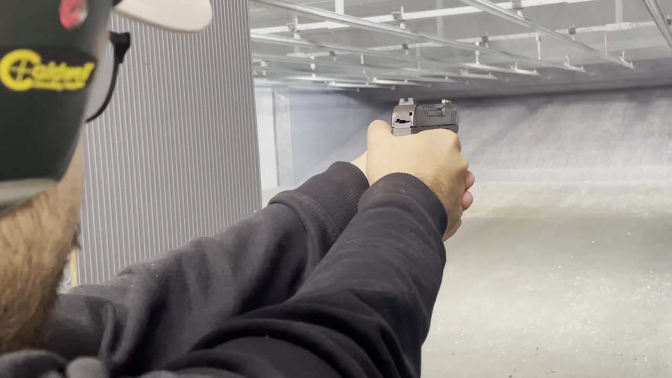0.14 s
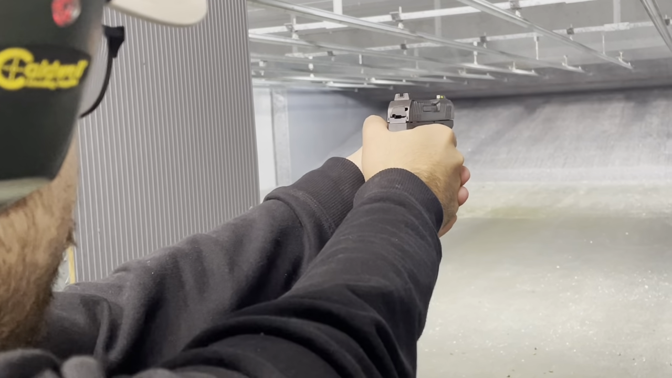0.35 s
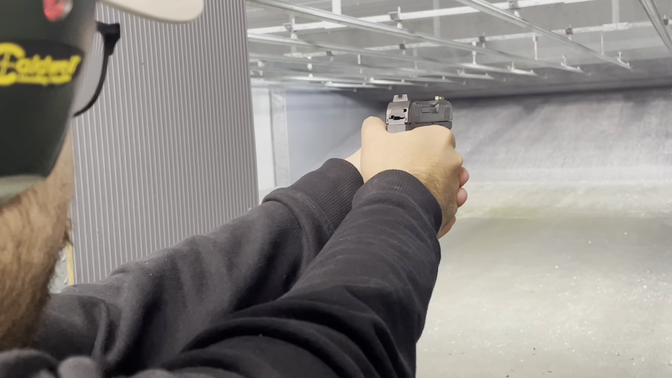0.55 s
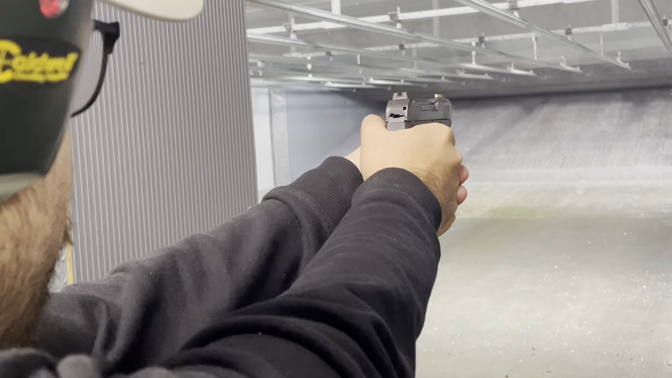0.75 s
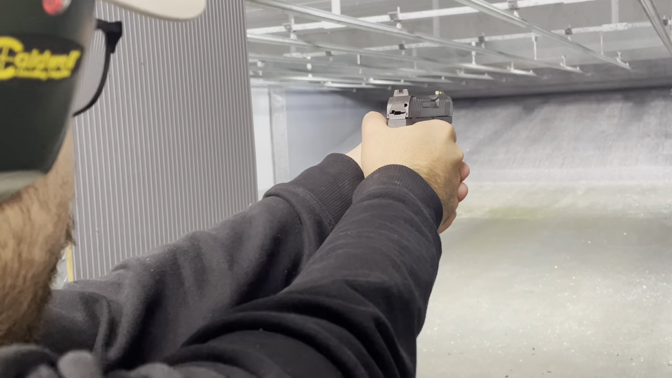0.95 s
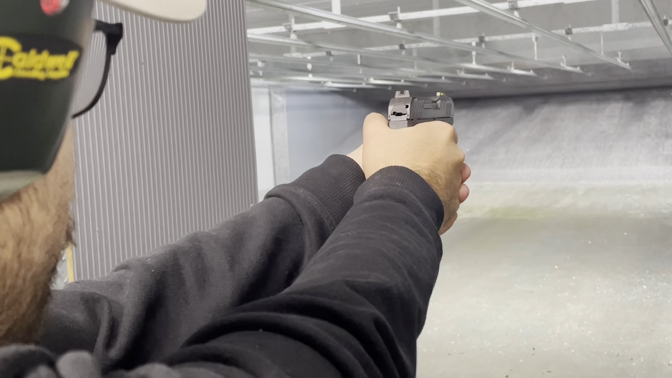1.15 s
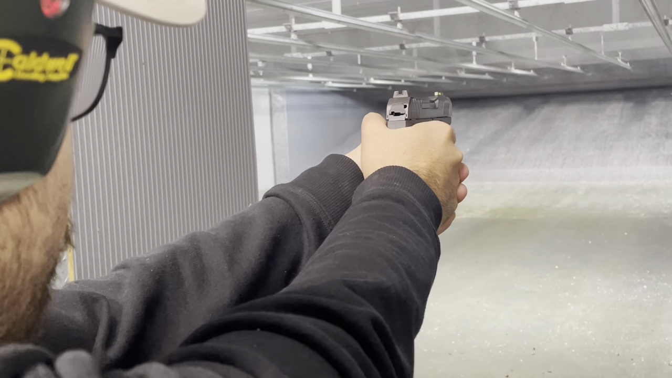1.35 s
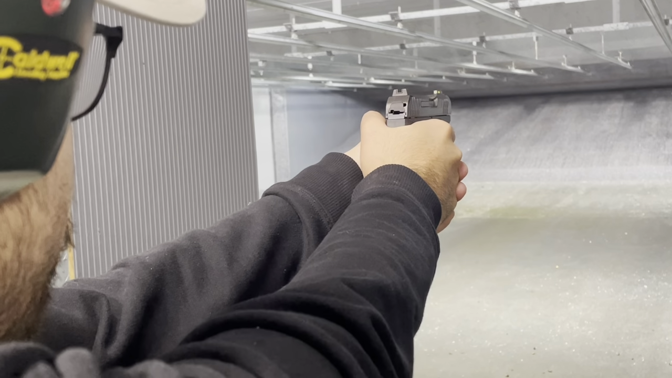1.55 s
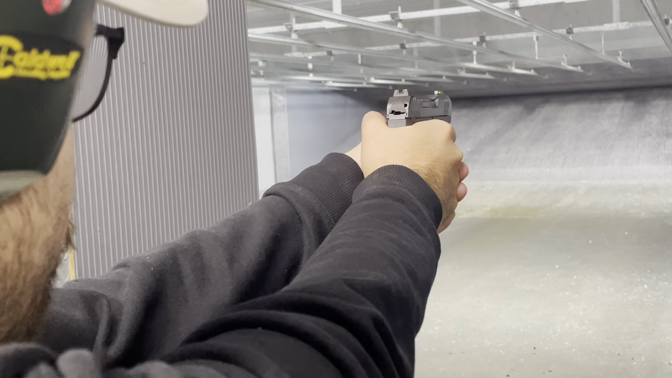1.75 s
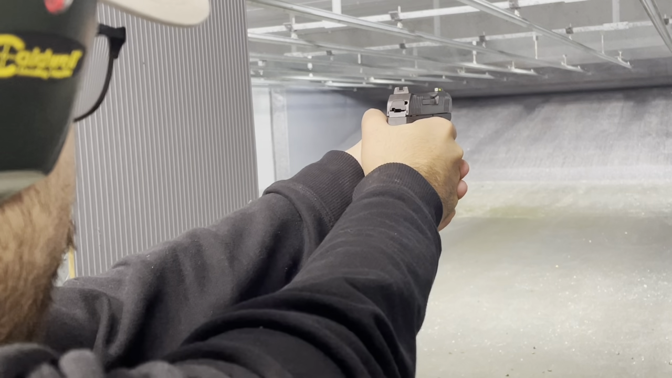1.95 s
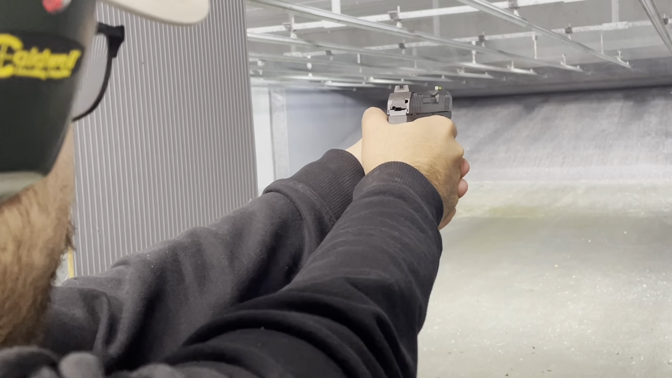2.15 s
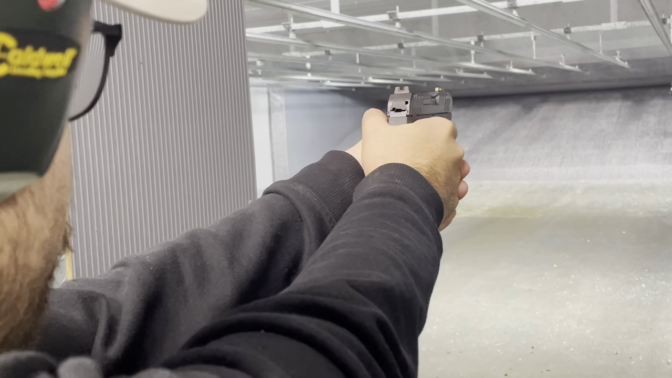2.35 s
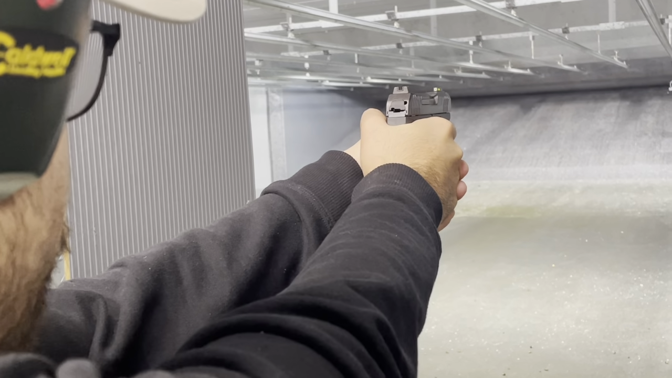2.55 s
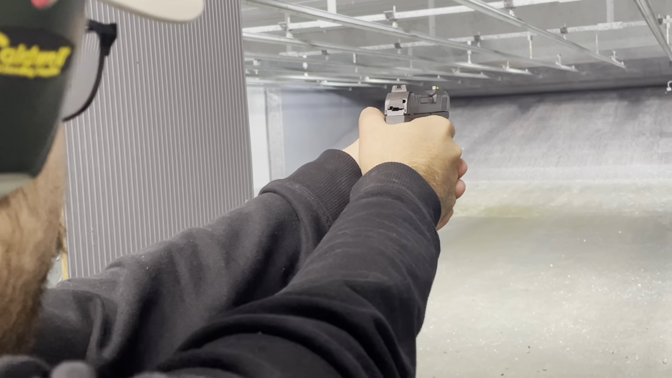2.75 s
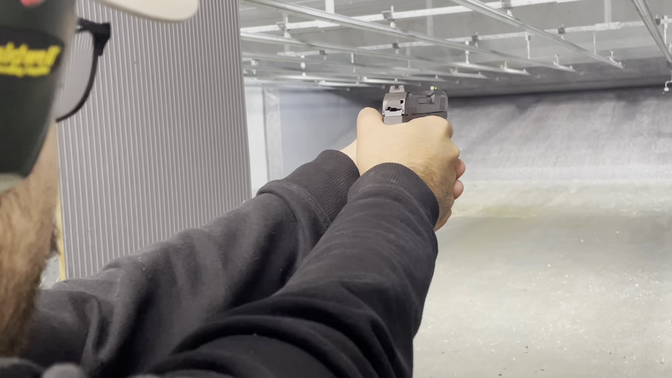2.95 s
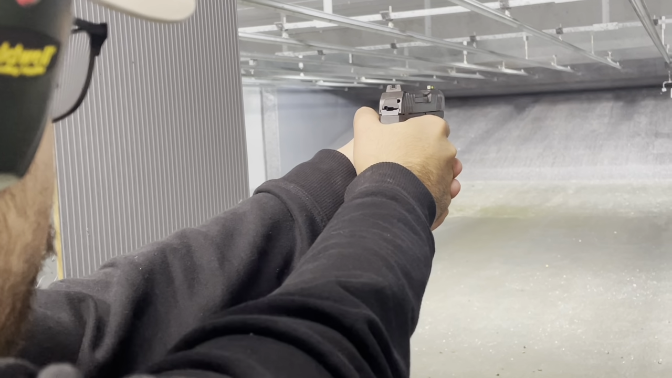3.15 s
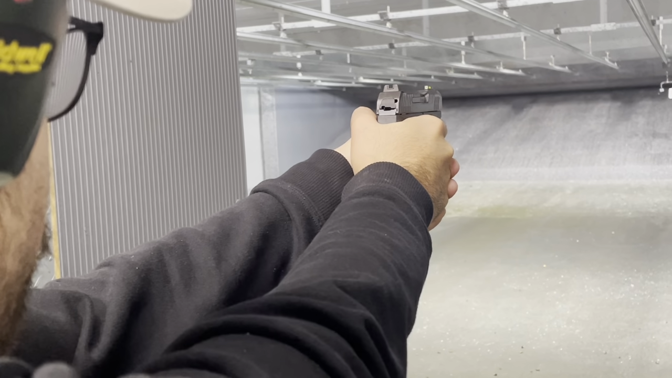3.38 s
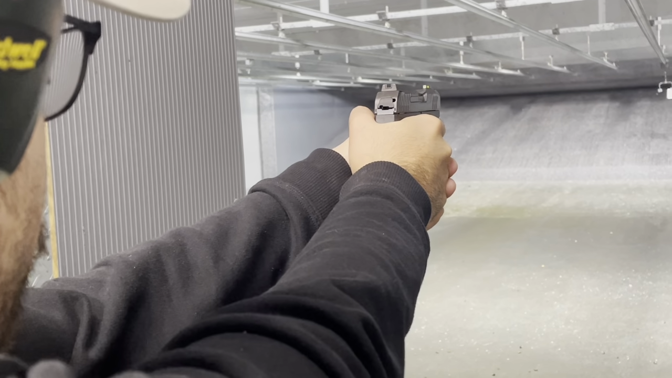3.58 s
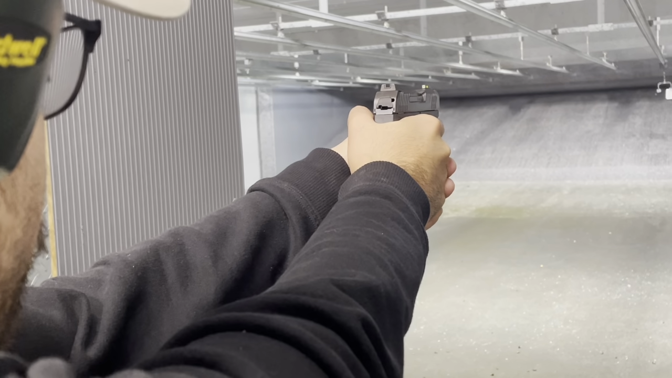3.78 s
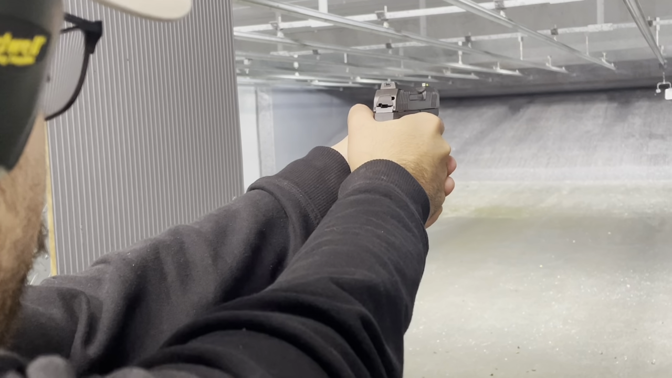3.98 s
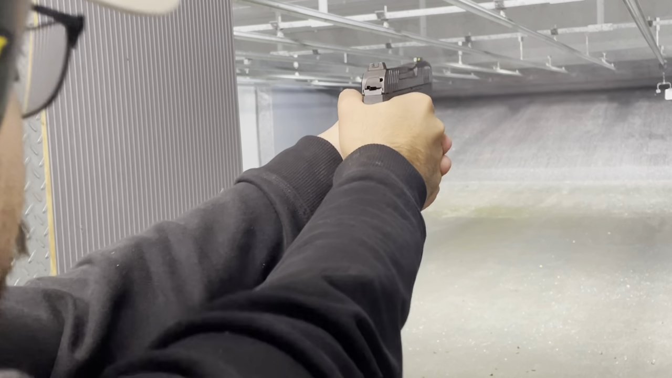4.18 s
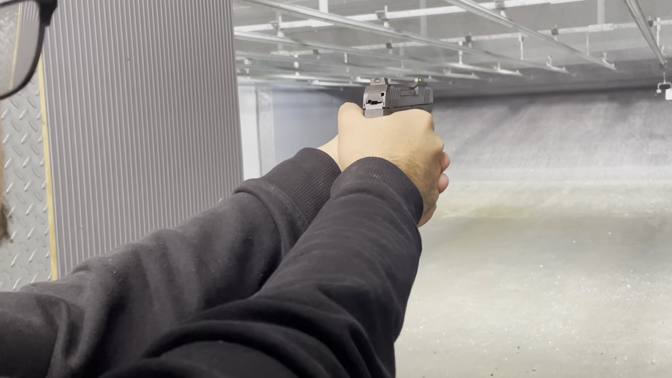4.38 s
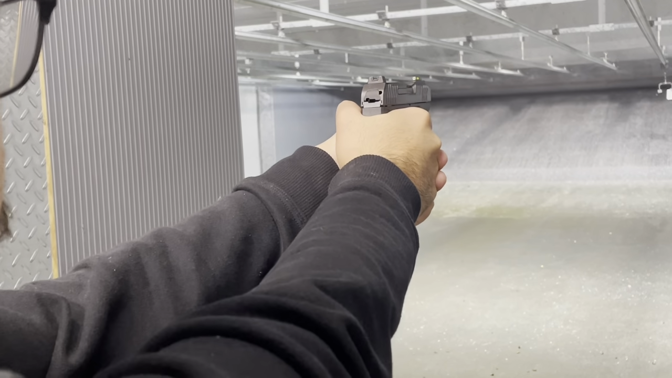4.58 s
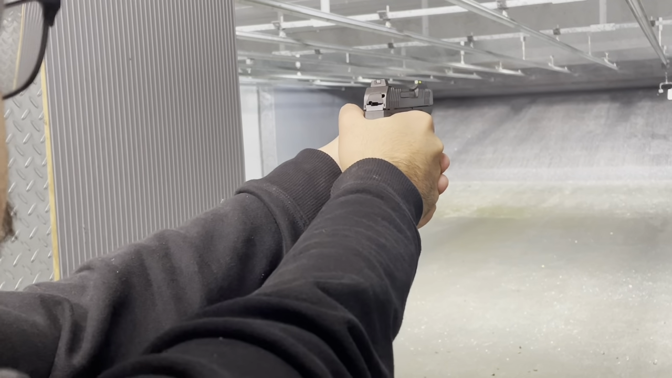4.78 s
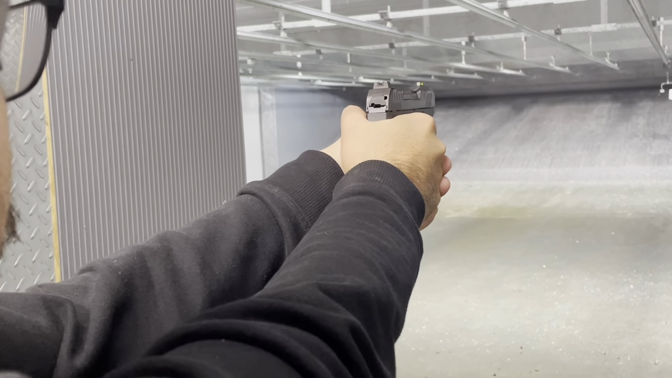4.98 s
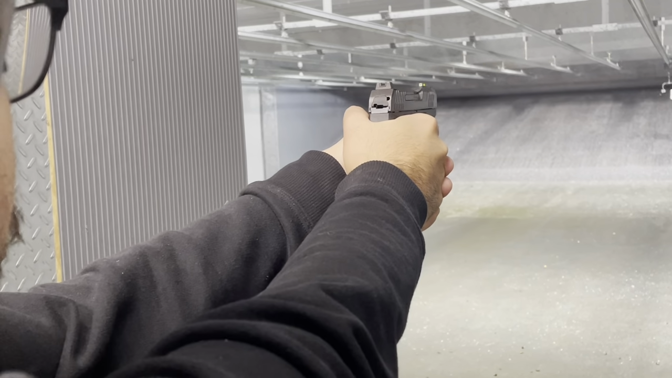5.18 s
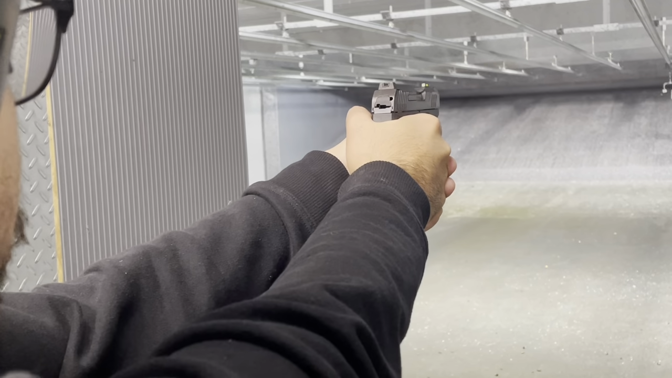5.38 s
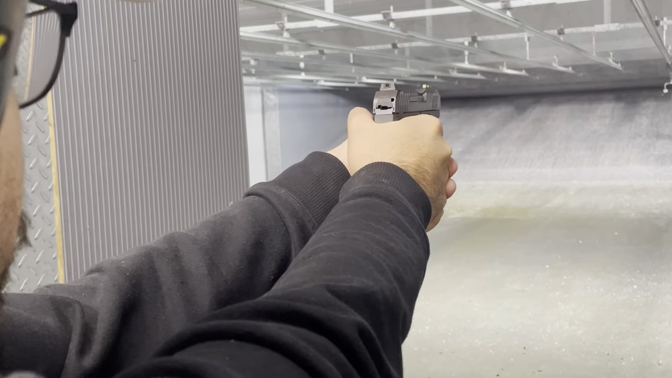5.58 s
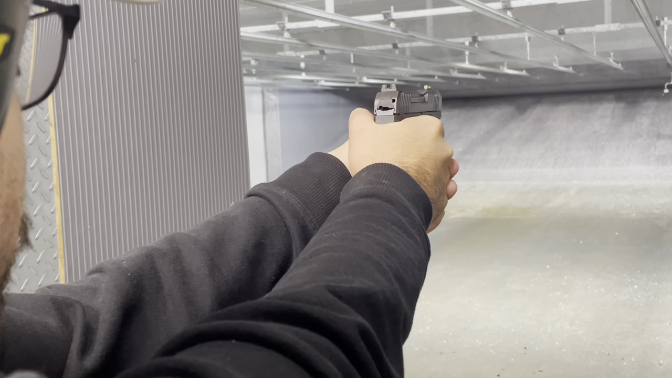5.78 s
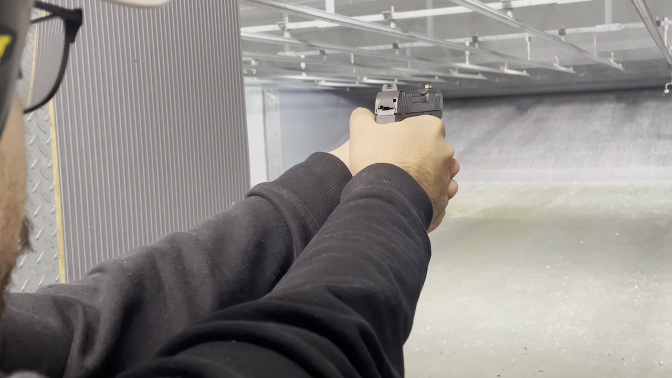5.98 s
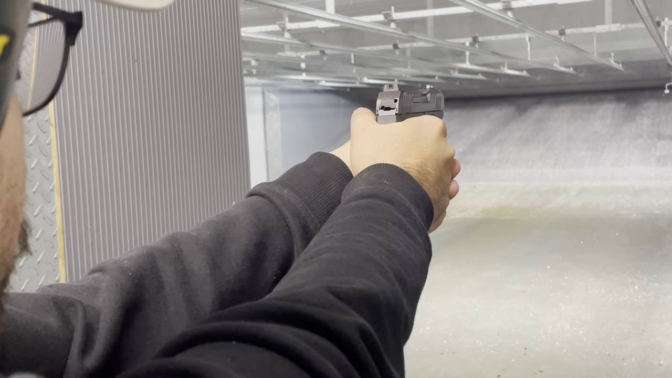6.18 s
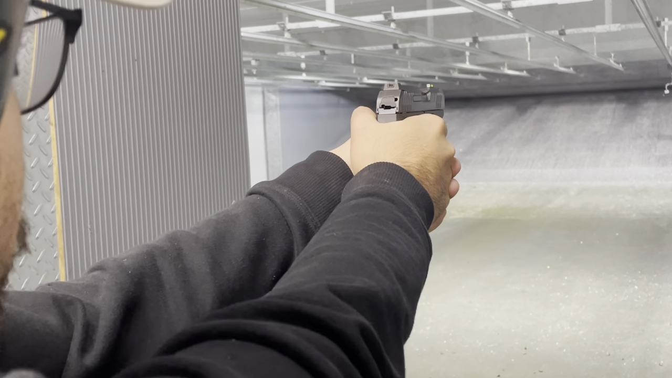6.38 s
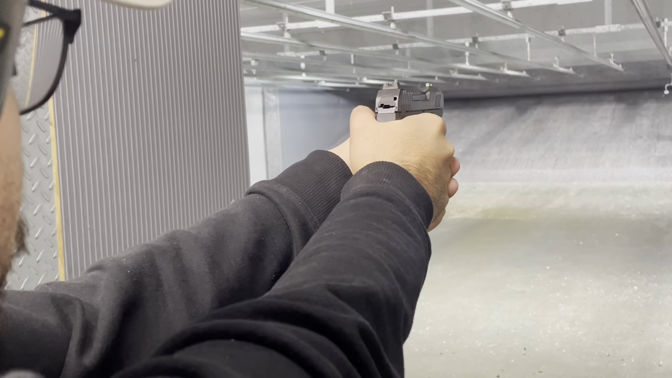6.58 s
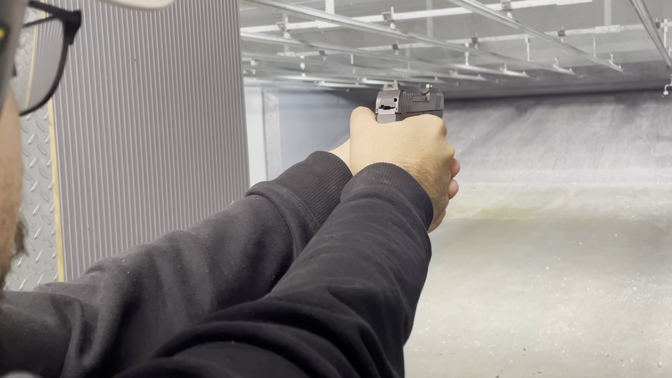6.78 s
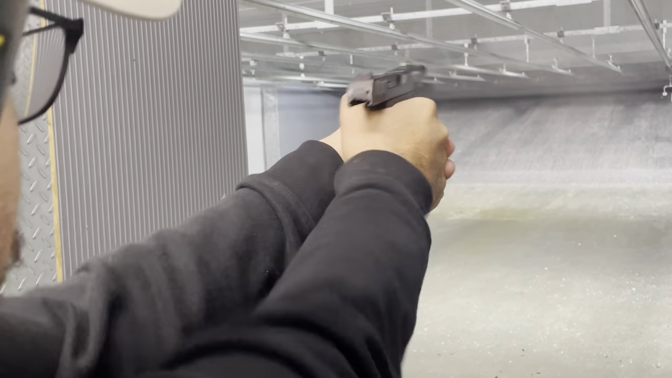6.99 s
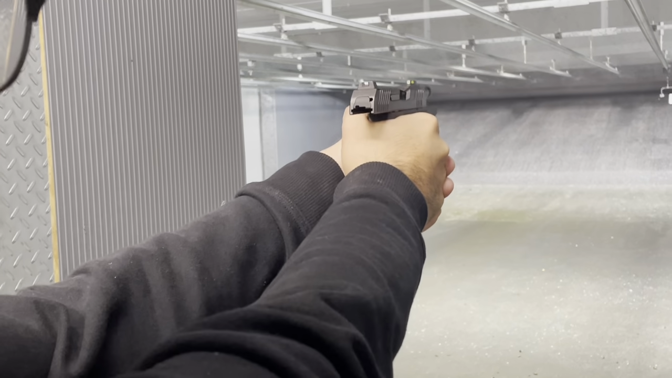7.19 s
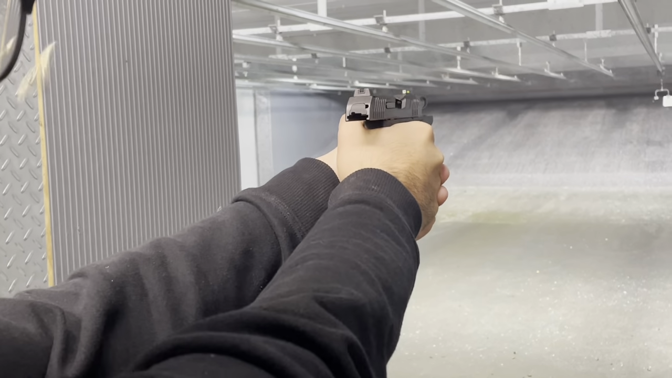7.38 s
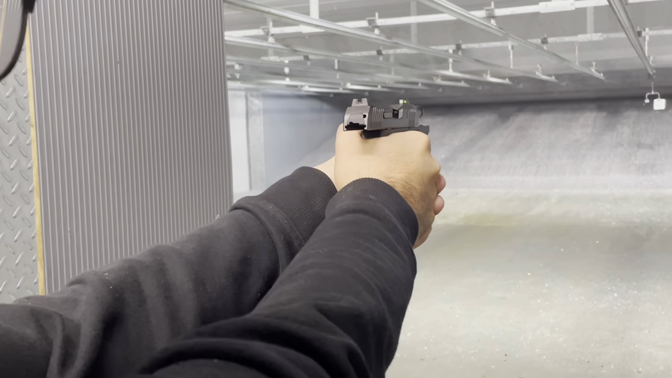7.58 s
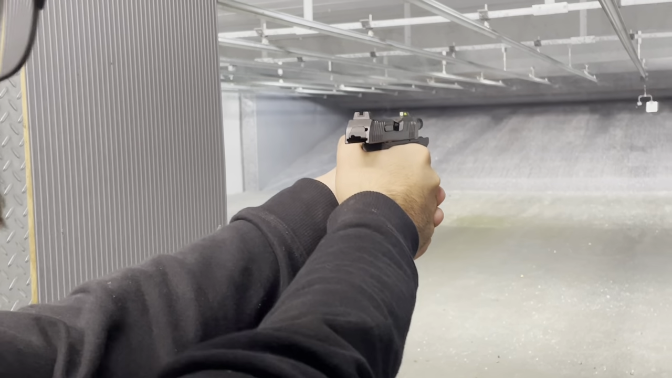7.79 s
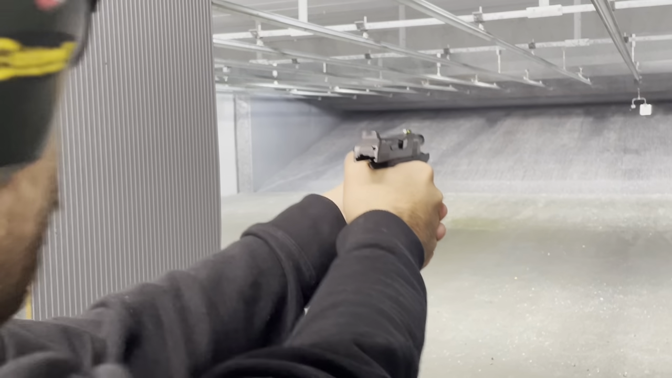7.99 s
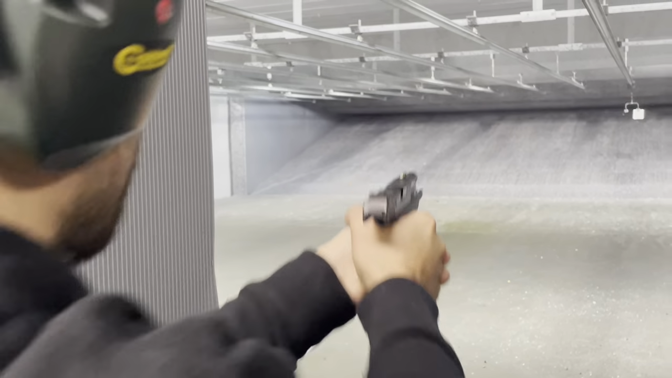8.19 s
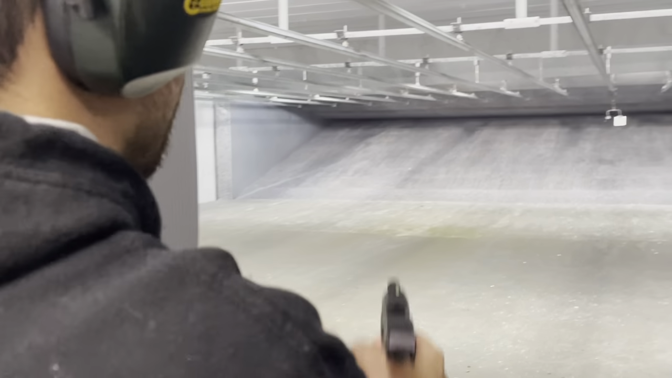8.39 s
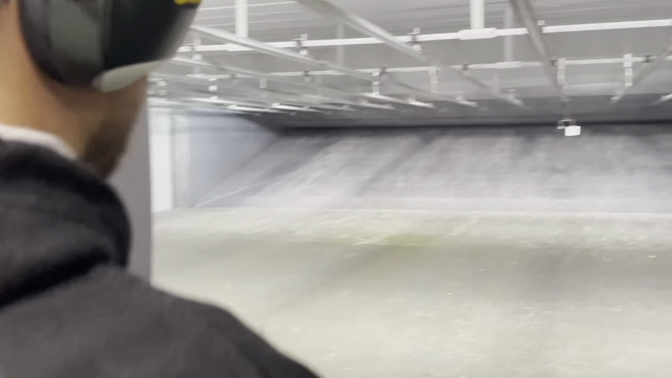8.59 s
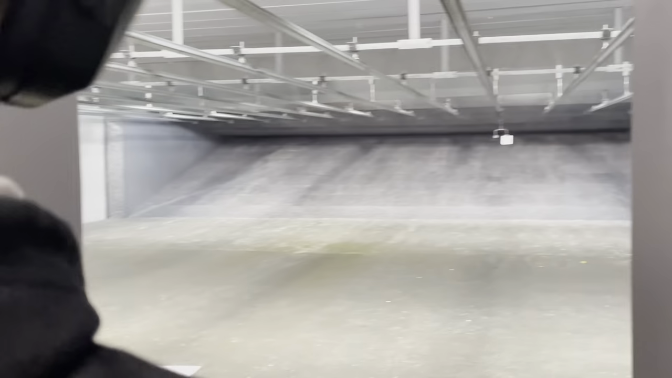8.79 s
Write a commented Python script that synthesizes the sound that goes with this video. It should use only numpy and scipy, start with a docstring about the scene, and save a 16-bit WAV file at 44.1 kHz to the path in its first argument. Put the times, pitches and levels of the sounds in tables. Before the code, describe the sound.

In a long concrete indoor range, one pistol shot's roar dies away, then two more shots blast out with long echoes over faint ventilation hum.

```python
"""Three pistol shots in a long concrete shooting range, heard from just behind the shooter's booth.
The first is fired just before the start: its roar, banded noise decaying treble first, is already dying away.
Ventilation, shaped noise, hums throughout. Brass cases tinkle on the floor as noise ticks and beating damped sines;
the trigger clicks as it resets, noise through steel resonances. At the second and third shots the booth rings
briefly (banded noise and damped modes), the far end of the hall answers, and the long roar and the cases follow."""
import sys
import numpy as np
from scipy import signal
from scipy.fft import rfft, irfft, next_fast_len
from scipy.io import wavfile
from scipy.ndimage import uniform_filter1d, minimum_filter1d, map_coordinates

SR = 44100
rng = np.random.default_rng(int(sys.argv[2]) if len(sys.argv) > 2 else 0)


def digitize_waveform(pressure):
    """Quantize a signal to 16-bit integers and store it at the path in sys.argv[1].

    Rows of a 2-D input are taken as channels; values are limited to [-1, 1].
    """
    field = np.atleast_2d(pressure).T
    bounded = np.clip(field, -1, 1)
    quanta = np.round(bounded * 32767).astype(np.int16)
    wavfile.write(sys.argv[1], SR, quanta)


N = 389844


def amp(db):
    """Amplitude ratio of a level: 20 dB to each factor of ten."""
    return 10 ** (np.asarray(db) / 20)


def along(points, hz):
    """Interpolate (Hz, value) points on a logarithmic frequency axis."""
    point_hz, value = np.transpose(points)
    return np.interp(np.log(hz + 1), np.log(point_hz + 1), value)


def add(track, sound, s):
    """Superposition: mix a sound into the track at s seconds, cutting what lies outside."""
    start = round(s * SR)
    part = sound[..., max(-start, 0):track.shape[-1] - start]
    first = max(start, 0)
    track[..., first:first + part.shape[-1]] += part


def ports(pair, hz):
    """Interchannel level and phase: each microphone port adds its own to a pair of spectra."""
    # left level over right: frequency_hz, difference_db
    lean = [(60, 0.8), (140, 0), (330, 0), (500, -3.5), (850, -2.5), (1200, -1), (1600, 0.2), (4000, 0),
            (15000, 1)]
    # phase by which left leads, into opposition near 9 kHz and back: frequency_hz, phase_rad
    lead = [(1800, 0), (2900, .55), (5200, .6), (5800, -1.45), (6700, -.8), (7100, -1.1), (7600, -2.3),
            (8000, -2.2), (8350, -np.pi), (9500, -np.pi), (10300, -4.3), (11000, -4.6), (12000, -5.6),
            (13300, -2 * np.pi)]
    tilt = amp(along(lean, hz) / 2) * np.exp(.5j * along(lead, hz))
    return pair * [tilt, 1 / tilt]


def diffuse(spectrum, size, bass_apart):
    """Diffuse field: spectra of partly coherent noise, rms 1; bass_apart lowers the likeness of the bass."""
    # left-right likeness before the ports: frequency_hz, correlation
    likeness = [(60, .96), (200, .92), (330, .86), (500, .66), (770, .36), (1100, .3), (1600, .7),
                (2200, .96), (5000, .92), (5600, .84), (8000, .83), (8300, .9995), (9600, .9995),
                (10000, .82), (11700, .72), (12800, .985)]
    hz = np.fft.rfftfreq(size, 1 / SR)
    common, opposed = rfft(rng.standard_normal((2, size)))
    alike = along(likeness, hz) * (1 - bass_apart / (1 + (hz / 260) ** 4))
    # a sum and a difference of two noises correlate by the cosine of twice the mixing angle
    turn = np.arccos(np.clip(alike, -1, 1)) / 2
    mixed = np.cos(turn) * common + np.sin(turn) * opposed * [[1], [-1]]
    pair = amp(along(spectrum, hz)) * ports(mixed, hz)
    return hz, pair * size / np.sqrt(np.sum(abs(pair) ** 2))


def fading(spectrum, size, level_db, count, bass_apart):
    """Frequency-dependent decay: overlapping bands of diffuse noise, each following level_db(Hz, s)."""
    hz, pair = diffuse(spectrum, size, bass_apart)
    t = np.arange(size) / SR
    # band centres stand at equal ratios from 40 Hz to 16 kHz
    place = (count - 1) * np.clip(np.log((hz + 1) / 40) / np.log(400), 0, 1)
    out = np.zeros((2, size))
    for k in range(count):
        centre_hz = 40 * 400 ** (k / (count - 1))
        band = irfft(pair * np.clip(1 - abs(place - k), 0, 1), size)
        # reflections arrive in clumps, differently in each band: 22 levels a second, 1 dB deviation
        clumps_db = np.interp(t * 22, np.arange(100), rng.standard_normal(100))
        # a band needs about a cycle to build up
        build_up = (1 - np.exp(-t / (0.00027 + .5 / centre_hz))) ** 2
        out += band * amp(level_db(centre_hz, t) + clumps_db) * build_up
    return out


def ring(modes, t, phases):
    """Modal decay: a sum of damped sines from (Hz, dB, t60 s) rows."""
    return sum(amp(db - 60 * t / t60) * np.sin(2 * np.pi * hz * t + phase)
               for (hz, db, t60), phase in zip(modes, phases))


def nearby(x):
    """Point source: a small close sound as both ports hear it."""
    size = next_fast_len(N)
    hz = np.fft.rfftfreq(size, 1 / SR)
    return irfft(ports(rfft(x, size), hz), size)[:, :N]


def booth():
    """Early reflection and resonance: the blast bounces between partitions, bass modes stand out."""
    # relative spectrum of the bounces: frequency_hz, density_db (per Hz)
    bounce_spectrum = [(18, -52), (30, -17.5), (60, -12), (105, -15), (215, -16), (437, -3.5), (650, -9),
                       (940, -8), (1960, -23.5), (2600, -20.5), (3500, -25), (5300, -28.5), (7000, -31.5),
                       (9500, -24.5), (12000, -33), (15000, -36), (16000, -57.5)]
    # decay of the bounces: frequency_hz, t60_s
    bounce_t60 = [(50, 0.55), (200, 0.26), (500, 0.099), (1500, 0.21), (3500, 0.088), (7000, .15),
                  (13000, 0.14)]
    # reflections pile up until: frequency_hz, peak_s
    gather = [(300, 0.051), (1000, 0.015), (2000, 0.012), (3500, 0.011), (7000, 0.0086), (12000, 0.0028)]
    # panel and cavity modes: frequency_hz, level_db, t60_s
    panels = [(112, -23.5, 0.93), (216, -24, 0.19), (276, -22.5, 0.2), (379, -12, 0.34), (428, -13.5, 0.16),
              (533, -9, 0.082), (622, -10.5, 0.19), (964.4, -19.5, .2)]
    size = SR // 2
    t = np.arange(size) / SR

    def level_db(hz, t):
        peak_s = along(gather, hz)
        rise_db = -4 * np.maximum(1 - t / peak_s, 0)
        return rise_db - 60 * np.maximum(t - peak_s, 0) / along(bounce_t60, hz)

    bounce = fading(bounce_spectrum, size=size, level_db=level_db, count=16, bass_apart=.6)
    # neighbouring modes start in opposition, .6 rad apart between the channels
    start = np.pi * np.arange(len(panels))
    hum = np.array([ring(panels, t, start + side) for side in (.3, -.3)])
    return amp(-9.5) * bounce + hum * (1 - np.exp(-t / 0.00098)) ** 2


def hall():
    """Reverberation: the roar is held back until the far wall has answered, then each band dies at its own speed."""
    # relative spectrum of the roar: frequency_hz, density_db (per Hz)
    roar_spectrum = [(18, -59), (30, -35), (55, -18.5), (98, -11.5), (160, -14), (240, -12.5), (384, -5.5),
                     (760, -2), (1050, -5), (1400, -11.5), (1750, -17), (2300, -18.5), (4000, -27.5),
                     (6200, -32.5), (9500, -39.5), (14000, -52), (15000, -55), (15600, -89.5)]
    # decay of the main roar: frequency_hz, t60_s
    roar_t60 = [(40, 1), (70, 1.1), (110, 2.3), (200, 4.1), (400, 3.81), (800, 3.46), (1200, 3.39),
                (1600, 2.96), (2200, 2.53), (3000, 2.28), (4200, 1.76), (6500, 1.08), (10000, 0.72),
                (15000, 0.35)]
    # the roar before the far wall answers: frequency_hz, relative_db
    held = [(150, -4), (700, -7.5), (4000, -3), (12000, -4)]
    # the far wall's slap over the roar: frequency_hz, relative_db
    slap = [(150, 2.5), (700, 2.5), (4000, 2.5), (12000, 6)]
    # a faint part of the roar that hangs on longer: frequency_hz, relative_db, t60_s
    linger = [(150, -22.5, 5), (402, -16, 5.5), (900, -15, 5.9), (2000, -22, 3.2), (4000, -23.5, 2),
              (12000, -25, 2.1)]
    linger_level = [row[:2] for row in linger]
    linger_t60 = [row[::2] for row in linger]
    # the far wall answers after, builds up over, and its slap sinks into the roar in
    far_wall_s, arrival_s, slap_fade_s = 0.13, 0.015, 0.098

    def level_db(hz, t):
        arrived = .5 + .5 * np.tanh((t - far_wall_s) / arrival_s)
        slap_db = along(slap, hz) * np.exp(-np.maximum(t - far_wall_s, 0) / slap_fade_s)
        quick_db = -60 * (t - .2) / along(roar_t60, hz)
        slow_db = along(linger_level, hz) - 60 * (t - .2) / along(linger_t60, hz)
        # the two decays add as powers
        both_db = 10 * np.log10(amp(2 * quick_db) + amp(2 * slow_db))
        return (1 - arrived) * along(held, hz) + arrived * slap_db + both_db

    return amp(-16.5) * fading(roar_spectrum, size=SR * 9 // 2, level_db=level_db, count=20, bass_apart=.1)


def pistol():
    """Impulse response: gun, room and microphone keep their places, so every shot brings the same answer."""
    # shots, the first before the start: start_s, relative_db
    shots = [(-.1628, 0.5), (4.04, 0.94), (6.9316, 1.22)]
    answer, out = hall(), np.zeros((2, N))
    add(answer, booth(), 0)
    for s, db in shots:
        add(out, amp(db) * answer, s)
    return out


def ventilation():
    """Broadband air noise: a low rumble and air with a thin whine above it, each swelling and sinking a little."""
    # relative spectrum with a narrow whine: frequency_hz, density_db (per Hz)
    air_spectrum = [(20, -46), (32, -22.5), (52, -3.5), (80, -14), (102, -11), (150, -10.5), (250, -16.5),
                    (500, -17), (900, -22), (1500, -34.5), (2200, -39.5), (3800, -51.5), (4150, -43.5),
                    (4400, -37), (4600, -42.5), (4850, -58.5), (6700, -65), (7050, -55), (7350, -63),
                    (11000, -75.5)]
    level_db, rumble_sway_db, air_sway_db = -64, 1.5, .6
    size, t = next_fast_len(N), np.arange(N) / SR
    hz, pair = diffuse(air_spectrum, size=size, bass_apart=0)
    low = 1 / (1 + (hz / 400) ** 2)

    def wander(rate_hz):
        steps = rng.standard_normal(int(N * rate_hz / SR) + 4)
        return map_coordinates(steps, [t * rate_hz])

    rumble = amp(rumble_sway_db * (wander(2) + wander(8))) * irfft(pair * low, size)[:, :N]
    air = amp(air_sway_db * (wander(2) + wander(8))) * irfft(pair * (1 - low), size)[:, :N]
    return amp(level_db) * (rumble + air)


def cases():
    """Impact excitation: each bounce ticks and sets the brass ringing; the split mode beats."""
    # bounces of brass cases, levels relative: start_s, ring_db, tick_db
    bounces = [(0.833, -90, -55), (1.273, -84, -71.5), (1.297, -74, -78), (1.515, -84, -79),
               (1.7194, -86, -89), (4.8893, -78, -74), (4.9841, -84, -67), (5.7396, -88, -74),
               (5.8221, -78, -78), (7.853, -66.5, -63.5), (8.209, -76.5, -72), (8.4497, -70, -73),
               (8.7894, -88, -90)]
    # a split ring mode, levels before random variation: frequency_hz, level_db, t60_s
    brass = [(10580, -8.5, .3), (10630, -2.5, 0.37), (10680, -1, 0.32), (10760, -4, .22)]
    out, t = np.zeros(N), np.arange(SR // 3) / SR
    bright = signal.butter(2, [4500, 11500], "band", fs=SR, output="sos")
    tick_fade = amp(-60 * t / 0.017) + amp(-15.0 - 60 * t / .07)
    for s, ring_db, tick_db in bounces:
        modes = [(hz, db + rng.normal(0, 3), t60) for hz, db, t60 in brass]
        tone = ring(modes, t, rng.uniform(0, 2 * np.pi, len(brass)))
        # the case spins as it flies
        flutter = map_coordinates(rng.standard_normal(24), [t * 60])
        ringing = amp(ring_db + 4 * flutter) * tone * (1 - np.exp(-t / .002))
        tick = signal.sosfilt(bright, rng.standard_normal(len(t))) * tick_fade
        add(out, ringing + amp(tick_db) * tick, s)
    return nearby(out)


def trigger():
    """Resonant filtering: a dry steel click with a faint smear from the booth."""
    # clicks, peak level ahead of the ports: start_s, peak_db
    clicks = [(3.6173, -49.5), (6.790, -50)]
    # resonances of the trigger parts: frequency_hz, width_hz, relative_db
    resonances = [(2860, 700, -4.5), (7150, 2500, -7), (9890, 2500, -1), (14450, 1800, -4.5)]
    out, size = np.zeros(N), SR // 4
    t, hz = np.arange(size) / SR, np.fft.rfftfreq(size, 1 / SR)
    steel = 0
    for k, (centre, width, db) in enumerate(resonances):
        # neighbouring resonances have opposite signs
        damping = 1j * hz * width
        steel = steel + (-1) ** k * amp(db) * damping / (centre * centre - hz * hz + damping)
    shape = (amp(-60 * t / .008) + amp(-39.5 - 60 * t / 0.41)) * (1 - np.exp(-t / 0.0011))
    for s, db in clicks:
        click = irfft(rfft(rng.standard_normal(size) * shape) * steel, size)
        add(out, amp(db) * click / abs(click).max(), s)
    return nearby(out)


def scene():
    """Superposition of the shots, ventilation, cases and trigger."""
    return pistol() + ventilation() + cases() + trigger()


def record(dry):
    """Gain limiting and band limiting: peaks are held down, a faint recorder hiss joins, the top is cut."""
    ceiling, hiss_db, top_hz = .92, -102, 16100
    needed = np.minimum(1, ceiling / (abs(dry).max(axis=0) + 1e-9))
    # the gain is held and smoothed over samples on both sides of a peak
    gain = uniform_filter1d(minimum_filter1d(needed, size=161), size=81)
    taken = dry * gain + amp(hiss_db) * rng.standard_normal(dry.shape)
    size = next_fast_len(N + SR)
    passed = np.fft.rfftfreq(size, 1 / SR) < top_hz
    return irfft(rfft(taken, size) * passed, size)[:, :N]


dry = scene()
out = record(dry)
digitize_waveform(out)
```